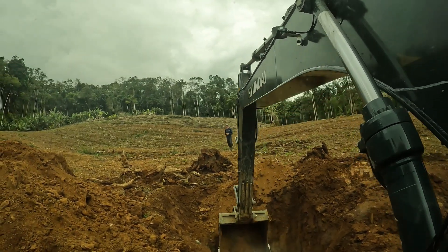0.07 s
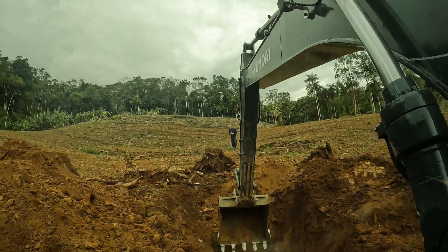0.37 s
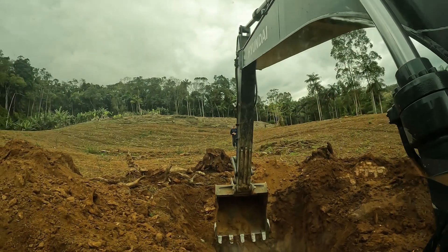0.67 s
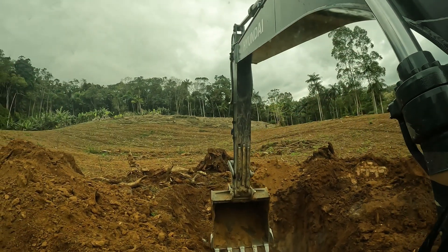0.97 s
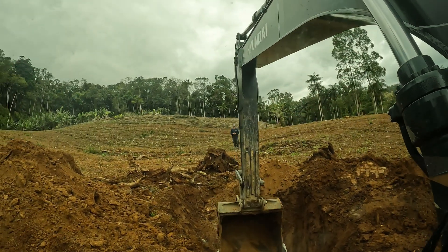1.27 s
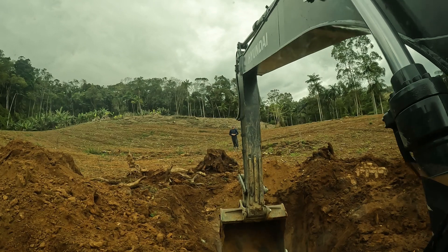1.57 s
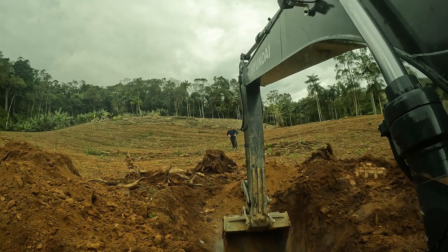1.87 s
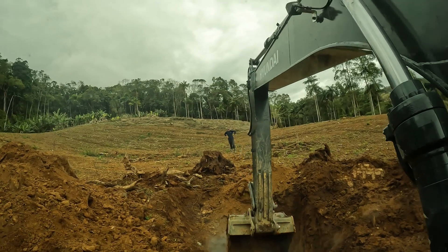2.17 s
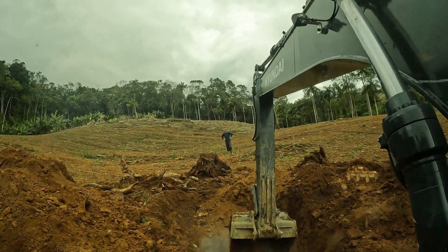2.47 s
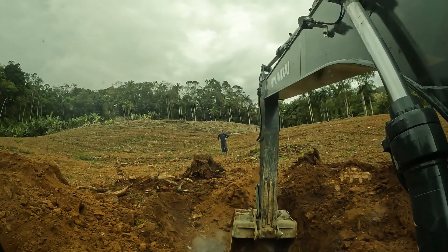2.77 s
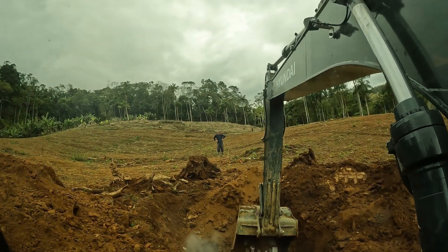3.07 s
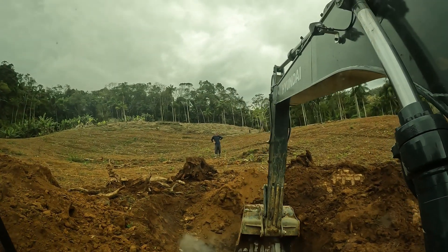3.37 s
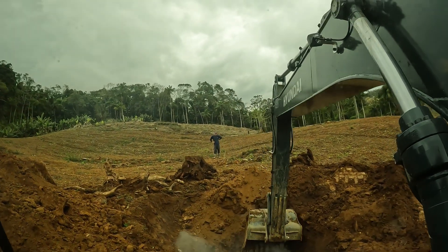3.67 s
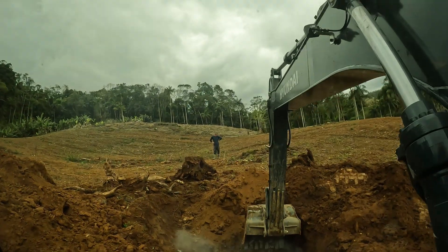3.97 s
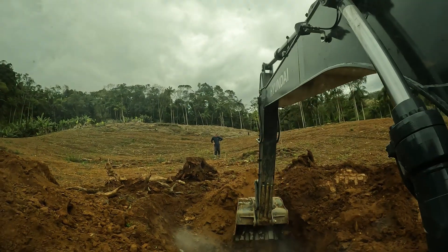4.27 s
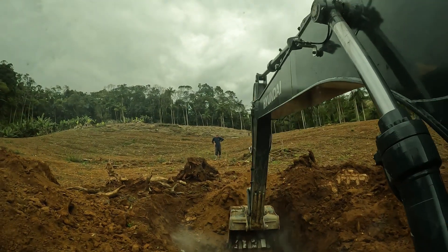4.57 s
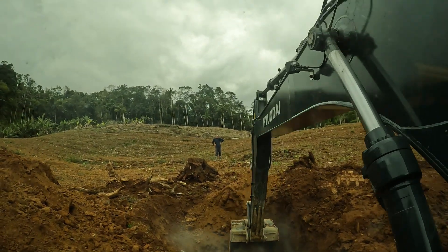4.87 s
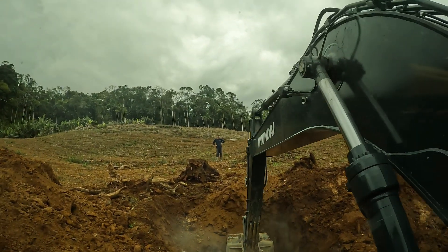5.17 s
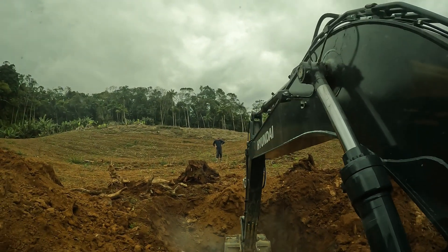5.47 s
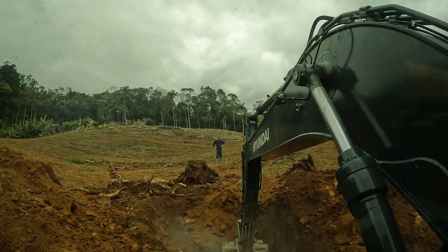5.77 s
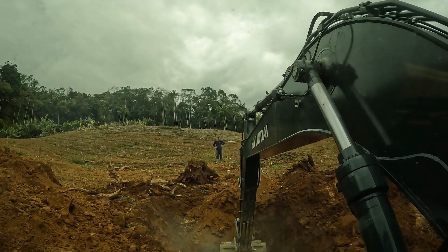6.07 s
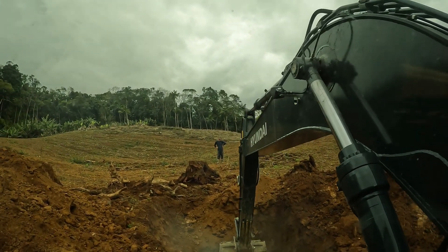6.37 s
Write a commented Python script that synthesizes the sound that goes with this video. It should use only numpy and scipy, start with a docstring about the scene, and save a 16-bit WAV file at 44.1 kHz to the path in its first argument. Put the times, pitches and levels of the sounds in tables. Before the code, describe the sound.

An excavator's diesel engine drones throughout, heard from the cab, with a deep rumble, a wavering pump hum and a soft rush of hydraulic oil. In the first second a faint valve hiss sounds as the bucket scrapes briefly. Clods thud into it around 0.5 seconds and again from 1 to 1.3. The loudest bite comes between 2 and 2.3 seconds: heavy hollow thuds, grinding grit and cracking stones. Lighter knocks and a pebble ping follow near 2.8. From 3.5 to 4.2 seconds the bucket drags through stones, crunching and scraping, with a quick cluster of ringing steel clanks. Smaller clanks come at 4.5, then more clods tumble until about 5. A short crunch and dull knocks arrive around 5.5, and a sharp clank rings just before 6, with the engine running on underneath.

```python
"""Excavator digging stony soil

Heard from the shaking cab, a diesel engine and its piston pump drone and sag under load.
Oil rushes in the hoses and hisses through a valve as the arm reaches out. The bucket drags through
the ground: clods thud into it, grit scrapes along it, stones crunch and tick, and the steel clanks."""
import sys
import numpy as np
from scipy import signal
from scipy.fft import rfft, irfft
from scipy.io import wavfile

SR = 44100
rng = np.random.default_rng(int(sys.argv[2]) if len(sys.argv) > 2 else 0)


def persist_wave(psi):
    """Save psi, clipped to +-1, as 16-bit WAV."""
    counts = np.round(np.clip(psi, -1, 1) * 32767).astype(np.int16)
    wavfile.write(sys.argv[1], SR, np.atleast_2d(counts).T)


N = 282681
TIME = np.arange(N) / SR


def amp(db):
    """Decibels to gain."""
    return 10 ** (np.asarray(db) / 20)


def unit_rms(x):
    """Scales to rms 1."""
    return x / np.sqrt(np.mean(x ** 2) + 1e-20)


def curve(rows, column=1):
    """One column of a time table as an automation curve."""
    columns = np.transpose(rows)
    return np.interp(TIME, columns[0], columns[column])


def coloured(x, spectrum, peaks=()):
    """EQs x with a curve (f/Hz, level/dB) and resonances (f/Hz, width/Hz, lift/dB), to rms 1."""
    hz, db = np.transpose(spectrum)
    bins = np.fft.rfftfreq(len(x), 1 / SR)
    level = np.interp(np.log(bins + 1), np.log(hz + 1), db)
    for centre, width, lift in peaks:
        level = level + lift / (1 + (2 * (bins - centre) / width) ** 2)
    return unit_rms(irfft(rfft(x) * amp(level), len(x)))


def noise(length=N):
    """White noise."""
    return rng.standard_normal(length)


def wander(hz):
    """Smooth random modulation up to about hz, at rms 1."""
    lowpass = np.exp(-(np.fft.rfftfreq(N, 1 / SR) / hz) ** 2)
    return unit_rms(irfft(rfft(noise()) * lowpass, N))


def grains(per_s, spread_db):
    """Random tiny impacts of uneven size."""
    size = amp(spread_db * np.minimum(rng.exponential(1, N), 3))
    return unit_rms(np.sign(noise()) * size * (rng.random(N) < per_s / SR))


def bursts(rows, rise):
    """Attack-decay envelope of blows (t/s, level/dB, decay/s)."""
    power = np.zeros(N)
    for s, db, fall in rows:
        age = np.maximum(TIME - s + rise / 2, 0)
        decay = np.exp(-np.maximum(age - rise, 0) / fall)
        power += (amp(db) * np.minimum(age / rise, 1) * decay) ** 2
    return np.sqrt(power)


def held(rows, rise, fall, column=2, lead=0, sag_db_per_s=0):
    """Attack-hold-release envelope of gestures (t/s, hold/s, level/dB in the given column)."""
    power = np.zeros(N)
    for row in rows:
        age = np.maximum(TIME - row[0] + lead, 0)
        release = np.exp(-np.maximum(age - rise - row[1] - lead, 0) / fall)
        power += (amp(row[column] - sag_db_per_s * age) * np.minimum(age / rise, 1) * release) ** 2
    return np.sqrt(power)


def steadied(x, seconds):
    """Levels out swells slower than the given time."""
    window = signal.windows.hann(int(seconds * SR))
    power = signal.fftconvolve(x ** 2, window / window.sum(), "same")
    return x / np.sqrt(power + 0.0011)


def add(mix, s, sound):
    """Drops a sound into the mix at time s."""
    part = mix[round(s * SR):][:len(sound)]
    part += sound[:len(part)]


# Oil flow fader: t/s, level/dB
OIL_LEVEL = [(0, -50), (.9, -53), (1.1, -55), (1.3, -52), (1.6, -54.5), (1.95, -51.5), (2.5, -61.5),
             (3.3, -53), (4.35, -62.5), (4.9, -59.5), (5.3, -58), (5.7, -53.5), (6.41, -53)]
# Hose rush EQ: f/Hz, level/dB
OIL_EQ = [(700, 5.5), (1500, -7), (2600, -2.5), (4000, -10.5), (6500, -20.5), (10000, -32.5), (15000, -57)]
def hoses():
    """Oil rushes through the hoses in a fluttering bed of noise."""
    return coloured(noise(), OIL_EQ) * amp(curve(OIL_LEVEL) + wander(33))


# Engine and fan roar EQ: f/Hz, level/dB
ROAR_EQ = [(100, -24), (170, -6.5), (225, 13), (290, -2), (390, 0.5), (520, -8), (650, -9), (850, -24.5),
           (1080, -28.5), (1350, -23.5), (2700, -35.5), (4200, -54.5), (8000, -51), (15000, -64)]
# Cab resonances: f/Hz, width/Hz, lift/dB
CAB_RESONANCES = [(213.7, 18, -4.5), (308.6, 28, 8), (366.5, 8.4, 10), (447, 9.9, -9), (484, 78, 9.5),
                  (732, 31, 10.5), (853, 120, 13.5), (1059.4, 81, 16.5), (1137, 70, 7.5)]
def roar():
    """Engine and fan roar through the resonant cab, louder as more oil flows."""
    usual_flow_db = -54.5
    effort_db = 0.45 * (curve(OIL_LEVEL) - usual_flow_db)
    return coloured(noise(), ROAR_EQ, CAB_RESONANCES) * amp(-37 + effort_db + .5 * wander(22))


# Pitch of the piston pump: t/s, f/Hz
PUMP_PITCH = [(0, 264.8), (.2, 271.9), (.5, 262), (.8, 270.8), (1.2, 265), (1.6, 274.7), (1.9, 275.1),
              (2.3, 253), (2.55, 260.6), (2.78, 255.3), (2.98, 265.8), (3.25, 263.2), (3.55, 267.3),
              (4.5, 260), (5.2, 255.9), (5.55, 266.9), (6.05, 254.1), (6.3, 260.3)]
# Drone faders: t/s, firing tone/dB, its octave/dB, pump tone/dB
DRONE_LEVELS = [(0, -21.5, -37, -34), (.25, -16.5, -39, -46.5), (.5, -39, -38, -39.5),
                (.75, -16, -44.5, -46.5), (1.2, -30, -27, -42), (1.45, -19, -43, -42.5),
                (1.97, -17.5, -38.5, -36.5), (2.2, -29.5, -40, -43), (2.75, -26.5, -36, -44),
                (2.98, -28.5, -35.5, -32), (3.3, -19, -30.5, -37.5), (3.5, -47.5, -39, -33),
                (4.3, -29, -39, -60), (4.9, -38.5, -37.5, -42.5), (5.25, -31.5, -28.5, -50.5),
                (5.5, -28, -37.5, -42.5), (5.7, -19, -24, -41.5), (6.05, -31, -24, -39.5),
                (6.41, -34, -35.5, -34.5)]
# Fader of the crankshaft's seventh harmonic: t/s, level/dB
SEVENTH_LEVEL = [(0, -51), (.7, -37.5), (1.1, -47.5), (1.9, -38.5), (2.4, -50.5), (3.4, -52), (4.0, -48),
                 (4.5, -48.5), (6.41, -54)]
# Weaker engine tones: multiple of crankshaft speed, level/dB
WEAK_HARMONICS = [(3, -46.5), (14, -56), (16, -68.5), (18, -53)]
def engine():
    """Four cylinders fire twice a turn; the pump and the other tones follow the same shaft."""
    pistons = 9
    shaft_hz = curve(PUMP_PITCH) / pistons * (1 + 0.00404 * wander(11.34))
    angle = 2 * np.pi * np.cumsum(shaft_hz) / SR

    def tone(multiple, db, jitter_rad, jitter_hz):
        return np.sqrt(2) * amp(db) * np.sin(multiple * angle + jitter_rad * wander(jitter_hz))

    firing = tone(2, curve(DRONE_LEVELS) + wander(6.5), .2, 10)
    octave = tone(4, curve(DRONE_LEVELS, column=2) + 2 * wander(1.9), .5, 16)
    pump = tone(pistons, curve(DRONE_LEVELS, column=3) + 2 * wander(1.7), .45, 13)
    weak = sum(tone(k, db + .45 * wander(2), 3.03, 4.9) for k, db in WEAK_HARMONICS)
    seventh = tone(7, curve(SEVENTH_LEVEL) + 2 * wander(1.9), .38, 13)
    return firing + octave + pump + seventh + weak


# Cab boom EQ: f/Hz, level/dB
BOOM_EQ = [(35, -55), (55, 6), (80, 9.5), (105, -2), (135, 2), (165, -9), (220, -30.5), (400, -73.5),
           (1500, -120)]
# Cab boom fader: t/s, level/dB
BOOM_LEVEL = [(0, -31), (.25, -26), (.5, -30), (.72, -26), (1.0, -27.5), (1.2, -22), (1.45, -28),
              (1.9, -28), (2.16, -20), (2.35, -26.5), (2.85, -24.5), (3.2, -29), (3.6, -25), (4.05, -28),
              (4.28, -32.5), (4.55, -24.5), (5.75, -29), (6.41, -28)]
# Droning panel EQ: f/Hz, level/dB
PANEL_EQ = [(55, -50.5), (76, -5.5), (84, -5), (97, -4.5), (125, -40), (400, -120)]
# Panel swells: t/s, hold/s, level/dB
PANEL_CUES = [(.2, .3, -19)]
def cab_panels():
    """The cab's panels boom as the machine strains; one drones as the arm lifts."""
    boom = steadied(coloured(noise(), BOOM_EQ), 0.36) * amp(curve(BOOM_LEVEL) + 2)
    drone = steadied(coloured(noise(), PANEL_EQ), 0.16) * held(PANEL_CUES, rise=0.14, fall=0.04)
    return boom + drone


# Valve hiss EQ: f/Hz, level/dB
HISS_EQ = [(3000, -9), (5000, -9.5), (6400, -11.5), (7100, -6.5), (8200, 0.5), (9100, -5.5), (10100, -1),
           (11300, -6), (13600, -4), (15000, -25.5)]
# Valve openings: t/s, hold/s, level/dB
HISS_CUES = [(.02, .05, -61.5), (.09, 0.29, -66), (.33, 0.023, -62.5), (.45, 0.36, -66.5),
             (.7, 0.15, -68.5), (1.16, .02, -72), (3.17, 0.039, -76), (3.41, 0.15, -73), (5.55, .2, -74.5),
             (6.35, 0.058, -63.5)]
# Thin whistle EQ: f/Hz, level/dB
WHISTLE_EQ = [(6500, -50.5), (7150, -14), (7350, -8), (7550, -13), (8200, -44)]
# Closing whistle: t/s, hold/s, level/dB
WHISTLE_CUES = [(5.24, 0.045, -73.5)]
def valve():
    """Throttled oil hisses, each resonance flaring on its own; the closing valve whistles."""
    rise, fall = 0.029, 0.04
    jet = sum(coloured(noise(), HISS_EQ, [(hz, 1100, 9)]) * amp(3 * wander(18))
              for hz in (6600, 7800, 8900, 10000))
    opening = held(HISS_CUES, rise, fall, sag_db_per_s=2.5)
    hiss = unit_rms(jet) * opening * amp(1.8 * wander(25))
    whistle = coloured(noise(), WHISTLE_EQ) * held(WHISTLE_CUES, rise, fall)
    return hiss + whistle


# Sub-bass sway EQ: f/Hz, level/dB
SWAY_EQ = [(10, -21.5), (18, -7.5), (23, 4), (28, 21), (34, 7), (45, -7.5), (58, -4.5), (75, -18.5),
           (120, -65.5), (500, -130)]
# Sway fader as the arm swings between drags: t/s, level/dB
SWING_LEVEL = [(0, -17), (1.4, -19), (1.55, -27), (1.95, -26.5), (2.15, -19), (2.6, -20.5), (5.3, -18),
               (6.41, -27)]
# Bucket drags, also cueing soil and grit: t/s, hold/s, soil/dB, grit/dB, sway/dB
DRAG_CUES = [(.38, 0.17, -33.5, -53, -17.5), (1.0, 0.027, -41, -68, -16), (1.19, 0.22, -42, -54.5, -17.5),
             (2.0, 0.16, -27, -45.5, -16.5), (2.34, 0.04, -38.5, -63.5, -17.5),
             (2.09, 0.13, -20.5, -37.5, -16), (2.69, 0.085, -33, -55.5, -17.5),
             (3.24, 0.067, -33, -72, -17), (3.48, 0.21, -27.5, -41.5, -12), (3.745, 0.17, -30, -41, -12),
             (3.96, 0.13, -33.5, -45, -16.5), (4.18, 0.015, -34.5, -52.5, -25),
             (4.5, 0.14, -36.5, -53, -18), (4.74, 0.044, -36, -46.5, -16), (4.94, 0.076, -36, -52, -16.5),
             (5.54, 0.018, -33, -76, -18), (5.88, 0.055, -29, -45.5, -14.5), (6.07, 0.47, -38.5, -61, -16)]
def cab_sway():
    """The cab sways on its mounts, taking up the strain just before each drag is heard."""
    jolt = held(DRAG_CUES, rise=0.032, fall=0.16, column=4, lead=0.044)
    motion = np.hypot(amp(curve(SWING_LEVEL)), jolt)
    return steadied(coloured(noise(), SWAY_EQ), 0.26) * motion * amp(-1)


# The heaviest lumps landing: t/s, level/dB
THUMP_HITS = [(.53, -20), (1.216, -18.5), (2.179, -17)]
def thumps():
    """A heavy lump sends one short, low push through the arm into the cab."""
    out, age = np.zeros(N), np.arange(SR // 4) / SR
    pitch_hz, attack_s = 128.7, 0.0093
    tone = np.sqrt(2) * np.sin(2 * np.pi * pitch_hz * age)
    envelope = age / attack_s * np.exp(1 - age / attack_s)
    for s, db in THUMP_HITS:
        add(out, s, amp(db) * tone * envelope)
    return out


BITE_S, YIELD_DB_PER_S = 0.024, 5  # the teeth bite in, then the ground gives way
# Soil rumble EQ: f/Hz, level/dB
SOIL_EQ = [(100, -13), (160, -2.5), (220, -2), (290, -6), (390, -0.5), (580, -10), (720, -9.5), (950, -23),
           (1400, -24), (3000, -64.5), (12000, -99.5)]
# Hollow body of the loaded bucket: f/Hz, width/Hz, lift/dB
BUCKET_BODY = [(233, 41, 9), (308, 38, 6), (411.4, 20, 6.5), (511, 25, 6.5), (581, 46, 7), (706, 18, 3.5),
               (800, 29, 0)]
def soil():
    """Soil tumbles in the hollow bucket with each drag and shifts loosely in between."""
    drag = held(DRAG_CUES, BITE_S, fall=0.053, sag_db_per_s=YIELD_DB_PER_S)
    load = np.hypot(amp(-47), drag)
    tumble = steadied(coloured(grains(2000, 3.5), SOIL_EQ, BUCKET_BODY), 0.055)
    return tumble * load * amp(-2.5 + 1.1 * wander(31))


# Steel bucket modes, damped by the soil inside: f/Hz, level/dB, t60/s
BUCKET_MODES = [(820, 0, .17), (862, -2, .16), (1052, -1, .2), (1232, -8, .26), (1321, -6, .36),
                (1430, -6, .28), (1470, -7, .26), (1582, -1.5, .37), (1703, -7, .28), (1794, -8, .3),
                (1846, -10, .28), (1932, -8, .22), (1964, -1.5, .42), (1998, -4, .22), (2070, -8, .16),
                (2235, -8, .17), (2360, -11, .16), (2440, -10, .14), (2560, -12, .14), (2920, -13, .1),
                (3140, -14, .09), (4010, -14, .1), (4160, -13, .11), (4400, -16, .07), (5970, -18, .05)]
def steel_ring(spot_hz):
    """One tap on the bucket: the struck spot favours modes near spot_hz; sliding soil blurs them."""
    age = np.arange(SR // 2) / SR
    reach_hz, blur_hz = 450, 7
    hz, db, t60 = np.transpose(BUCKET_MODES)[:, :, None]
    lift_db = 3 * np.exp(-((hz - spot_hz) / reach_hz) ** 2)
    size = amp(db + lift_db + 1.5 * rng.standard_normal(hz.shape))
    drift = np.cumsum(rng.standard_normal((len(hz), len(age))), 1) * np.sqrt(blur_hz / (2 * np.pi * SR))
    phase = 2 * np.pi * (hz * age + drift + rng.random(hz.shape))
    modes = size * np.exp(-np.log(1000) * age / t60) * np.sin(phase)
    return modes.sum(0) * np.sqrt(2) / np.linalg.norm(size)


# Grit scrape EQ: f/Hz, level/dB
GRIT_EQ = [(400, -8.5), (850, 8.5), (1300, 0), (1650, -3), (2000, -7), (3000, -5.5), (4000, -15.5),
           (5300, -18), (7000, -24.5), (9000, -31), (11000, -37.5), (13500, -38), (15000, -35)]
# Bucket plates singing under the grit: f/Hz, width/Hz, lift/dB
PLATE_RESONANCES = [(1125, 33, 5), (1960, 110, 3), (2450, 92, 7)]
# Crackle EQ for gravel and crushed stone: f/Hz, level/dB
CRACKLE_EQ = [(700, 5.5), (1800, 2.5), (4500, -7), (7000, -15.5), (10000, -23), (13800, -28), (15500, -25)]
def grit():
    """Grit grinds on the steel and makes it sing faintly; gravel crackles during each drag."""
    scrape = held(DRAG_CUES, BITE_S, fall=0.091, column=3, sag_db_per_s=YIELD_DB_PER_S)
    pressure = np.hypot(amp(-64), scrape) * amp(0.5 + 0.18 * wander(38))
    sand = steadied(coloured(grains(3500, 3.5), GRIT_EQ, PLATE_RESONANCES), 0.2) * pressure
    gravel = coloured(grains(120, 3), CRACKLE_EQ) * scrape
    friction = noise() * pressure
    modes = steel_ring(spot_hz=1700)
    singing = signal.fftconvolve(friction, modes / np.linalg.norm(modes))[:N]
    return sand + amp(-10) * gravel + amp(-18) * singing


# Pebble ping EQ: f/Hz, level/dB
PEBBLE_EQ = [(900, 2.5), (1670, -2), (2000, 4), (2350, -3.5), (2900, 1), (3700, -15.5), (5000, -14),
             (7000, -25), (10000, -30), (14000, -42.5)]
# Pebbles hitting the arm: t/s, level/dB, f/Hz
PEBBLE_HITS = [(.328, -36.5, 2000), (0.783, -43, 1690), (1.429, -36.5, 1990), (2.008, -30, 2130),
               (2.121, -27, 3014), (2.557, -43, 1980), (2.775, -47, 2920), (2.78, -34.5, 2960),
               (3.185, -44, 2788), (3.47, -34, 2885), (4.193, -46, 2706), (4.47, -44, 1900),
               (5.0282, -31.5, 2803), (5.121, -44, 2710)]
def pebbles():
    """Each pebble pings the arm briefly and leaves a faint rattle."""
    out, age = np.zeros(N), np.arange(SR // 5) / SR
    decay = np.exp(-age / .003) + amp(-19) * np.exp(-age / 0.035)
    envelope = np.minimum(age / 0.0017, 1) * decay
    for s, db, hz in PEBBLE_HITS:
        ping = coloured(noise(len(age)), PEBBLE_EQ, [(hz, 700, 4)])
        add(out, s, amp(db - 0.5) * steadied(ping, 0.0031) * envelope)
    return out


# Stones being crushed: t/s, level/dB, decay/s, spray lift/dB
CRUNCH_HITS = [(2.005, -39, 0.034, -11), (2.117, -46, .025, -19), (2.175, -35, 0.014, 15),
               (2.197, -35.5, 0.016, -12), (2.256, -41.5, 0.048, -6), (3.556, -43, 0.024, 3),
               (3.59, -37, 0.099, -4), (3.645, -51, .012, 2), (3.785, -41.5, 0.04, 5),
               (3.845, -35, 0.041, -5), (3.9, -46, 0.013, 9), (3.937, -49, 0.018, 13),
               (4.036, -48, 0.024, -6), (4.118, -46.5, 0.014, 11), (5.406, -41, 0.019, 9),
               (6.369, -50, 0.043, -5)]
def stones():
    """Stones crumble under the teeth in a shower of cracks, some with a spray of fine dust."""
    out, age = np.zeros(N), np.arange(-SR // 20, SR // 4) / SR
    crumble_s, spray_hz, spray_width_hz = .011, 13000, 6700
    cracks = grains(4500, 3.5)
    past_peak = age - crumble_s / 2
    attack = np.exp(-(np.minimum(past_peak, 0) / crumble_s) ** 2)
    for s, db, fall, spray_db in CRUNCH_HITS:
        start = rng.integers(N - len(age))
        shower = coloured(cracks[start:][:len(age)], CRACKLE_EQ, [(spray_hz, spray_width_hz, spray_db)])
        decay = np.exp(-np.maximum(past_peak, 0) / fall)
        add(out, s + age[0], amp(db) * shower * attack * decay)
    return out


# Steel-on-stone chatter EQ: f/Hz, level/dB
CHATTER_EQ = [(450, -17), (850, 12), (1500, 2), (2100, 1.5), (2700, -3.5), (3500, -11), (4300, -9.5),
              (5300, -15.5), (6100, -18), (7300, -22), (9000, -50), (14000, -73)]
# Knocks of the bucket and its pins: t/s, chatter/dB, chatter decay/s, ring/dB, favoured f/Hz
CLANK_HITS = [(.415, -40, 0.029, -49, 1110), (3.589, -33, 0.03, -30.5, 2100), (3.63, -37, .04, -38, 1350),
              (3.668, -42, .025, -38, 2000), (3.738, -39, .018, -40, 2100), (3.819, -44, 0.026, -43, 1700),
              (4.06, -47, .03, -45, 1450), (4.11, -45, .025, -47, 1450), (4.516, -43, .015, -41, 1980),
              (4.526, -43, 0.02, -40, 800), (5.938, -35, .012, -38, 900), (5.947, -30, 0.03, -30, 900),
              (5.98, -34, 0.03, -38, 2050)]
def clanks():
    """Each blow sets the steel ringing; it chatters on stone for a moment, then rings on alone."""
    ringing, age = np.zeros(N), np.arange(SR // 2) / SR
    attack = np.minimum(age / .004, 1)
    for s, _, _, ring_db, spot_hz in CLANK_HITS:
        add(ringing, s, amp(ring_db) * steel_ring(spot_hz) * attack)
    blows = bursts([row[:3] for row in CLANK_HITS], rise=.008)
    chatter = coloured(grains(10000, 1.4), CHATTER_EQ) * blows
    flutter = unit_rms(1 + .3 * wander(90))
    return ringing * flutter + amp(-3.5) * chatter


# Crumbling earth EQ: f/Hz, level/dB
CRUMB_EQ = [(100, -15), (200, -1), (290, -6.5), (390, -1), (720, -13.5), (950, -20), (1400, -31.5),
            (3000, -65.5), (12000, -99)]
# Clods landing in the bucket: t/s, level/dB, decay/s, f/Hz
CLOD_HITS = [(.446, -25, 0.018, 411), (0.52, -37, 0.04, 510), (0.551, -26, 0.038, 310),
             (0.859, -34.5, 0.054, 520), (1.024, -21, 0.026, 437.3), (1.052, -31, 0.038, 523),
             (1.198, -21, 0.03, 380), (1.328, -30, 0.036, 638), (2.062, -24, .02, 480),
             (2.091, -33, 0.016, 532.6), (2.129, -12, 0.018, 579.6), (2.187, -14, 0.039, 419),
             (2.691, -28, 0.034, 399.1), (2.711, -31, 0.025, 455), (2.748, -32.5, .02, 402),
             (2.783, -28.5, 0.023, 435), (3.503, -21.5, 0.018, 478), (3.526, -22.5, 0.035, 403),
             (3.785, -20.5, 0.031, 384.3), (3.845, -23.5, 0.052, 397), (3.973, -22, 0.019, 623),
             (4.207, -36.5, 0.019, 595), (4.412, -33, 0.022, 704), (4.64, -32, 0.063, 483.3),
             (4.741, -20.5, 0.026, 494), (4.752, -21, 0.041, 202.5), (4.799, -21.5, 0.027, 544),
             (4.827, -29.5, 0.018, 610), (5.425, -26.5, 0.025, 375), (5.527, -29, 0.023, 544),
             (5.581, -25, 0.036, 491), (5.612, -30.5, 0.018, 566)]
def clods():
    """Each clod knocks on the hollow bucket at its own pitch and breaks up with a dull thud."""
    out, age = np.zeros(N), np.arange(SR // 3) / SR
    for s, db, fall, hz in CLOD_HITS:
        crumbs = steadied(coloured(noise(len(age)), CRUMB_EQ, BUCKET_BODY + [(hz, 220, 4)]), 0.006)
        knock = np.sqrt(2) * np.sin(2 * np.pi * hz * age) * np.exp(-age / 0.055)
        envelope = np.minimum(age / .011, 1) * np.exp(-age / fall)
        add(out, s, amp(db) * (amp(-2.5) * knock + amp(1) * crumbs) * envelope)
    return out


def scene():
    """The machine's bed with the digging on top, in mono."""
    machine = engine() + roar() + cab_sway() + cab_panels() + thumps() + hoses() + valve()
    digging = soil() + grit() + clods() + stones() + pebbles() + clanks()
    return (machine + digging)[None]


def record(dry):
    """A 5 ms fade at both ends and a steep high cut."""
    fade = np.minimum(np.minimum(TIME, TIME[::-1]) / .005, 1)
    high_cut = signal.firwin(301, 14500, window=("kaiser", 9), fs=SR)
    return signal.oaconvolve(dry * fade, high_cut[None], "same")


dry = scene()
out = record(dry)
persist_wave(out)
```